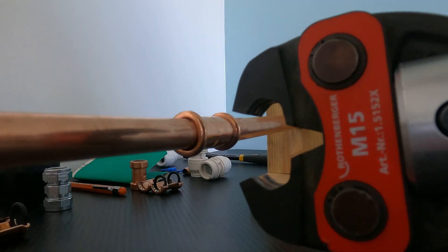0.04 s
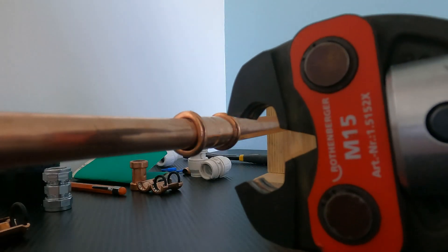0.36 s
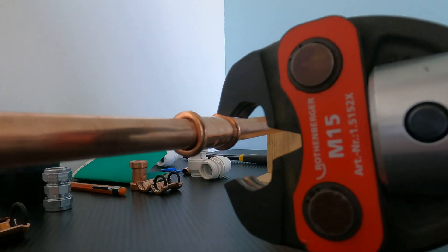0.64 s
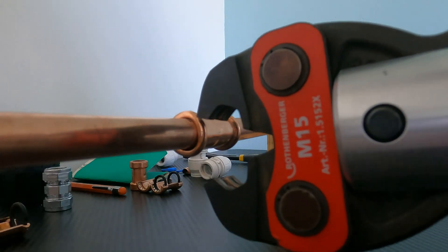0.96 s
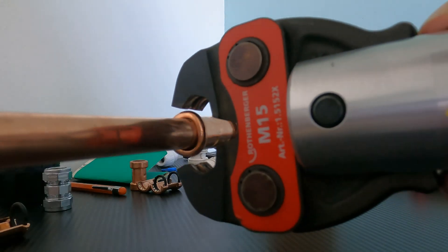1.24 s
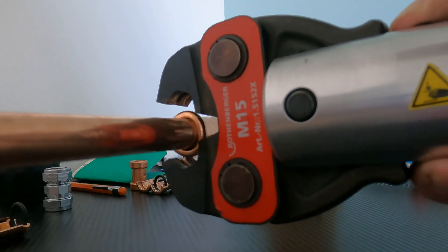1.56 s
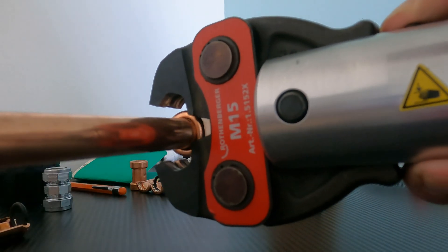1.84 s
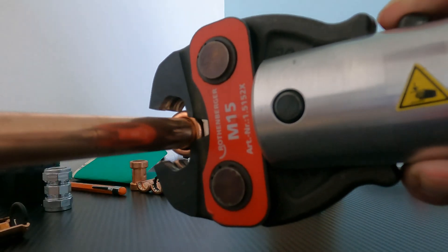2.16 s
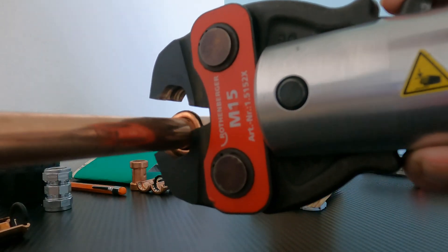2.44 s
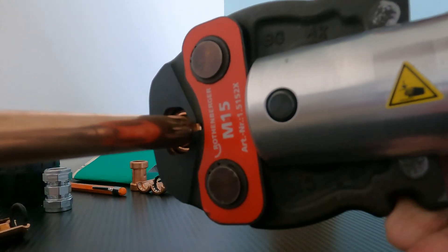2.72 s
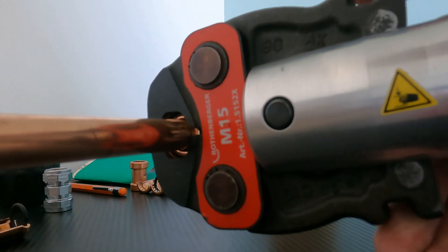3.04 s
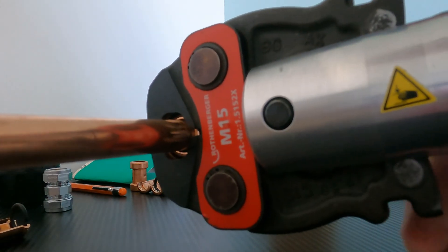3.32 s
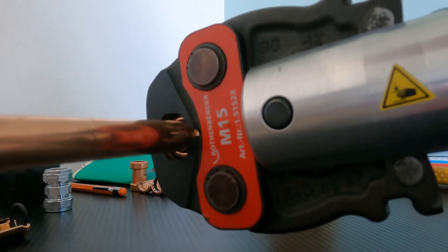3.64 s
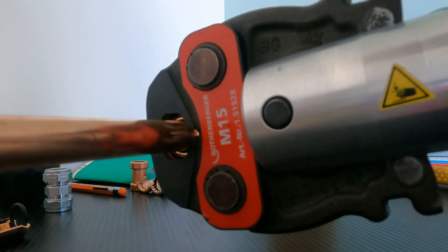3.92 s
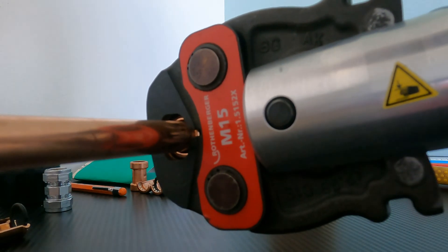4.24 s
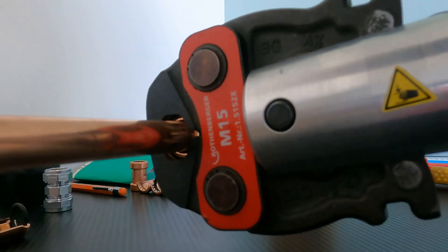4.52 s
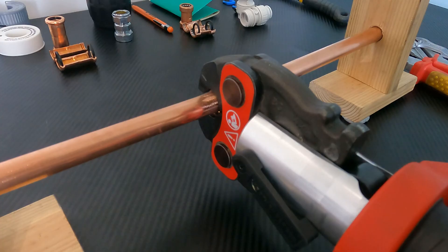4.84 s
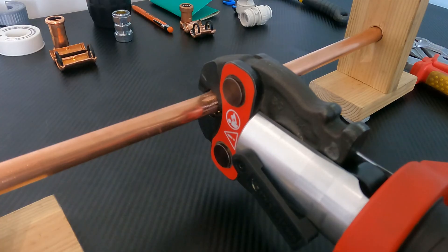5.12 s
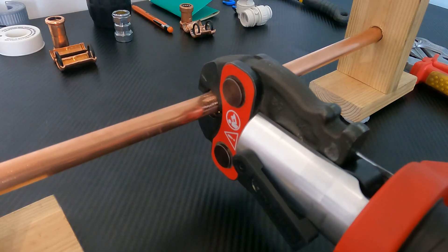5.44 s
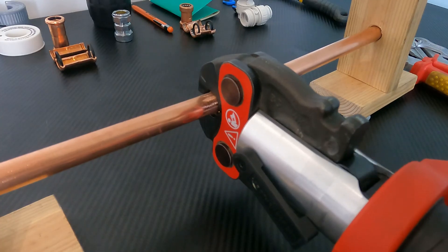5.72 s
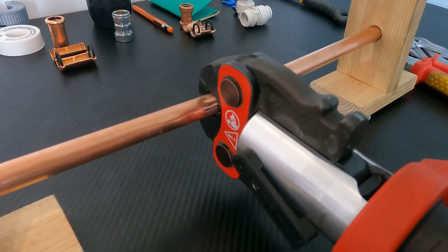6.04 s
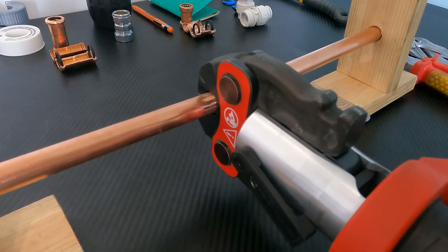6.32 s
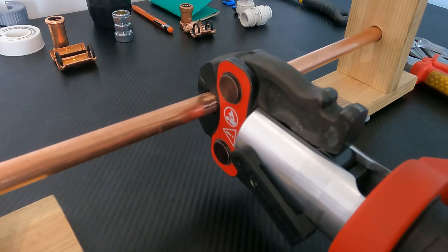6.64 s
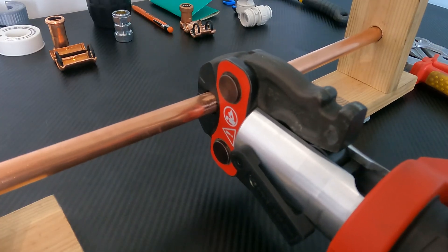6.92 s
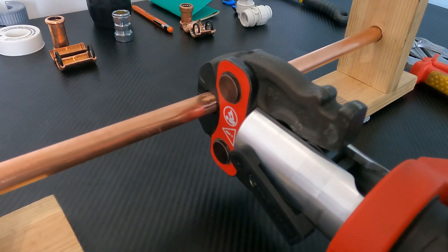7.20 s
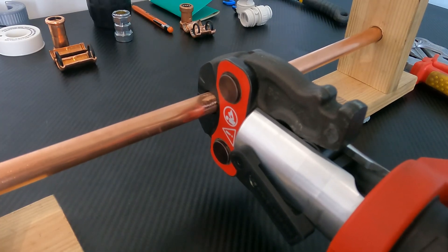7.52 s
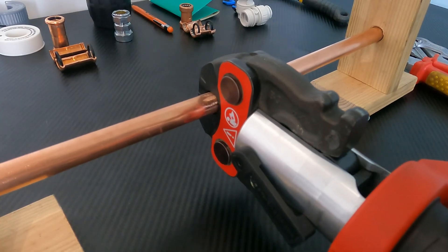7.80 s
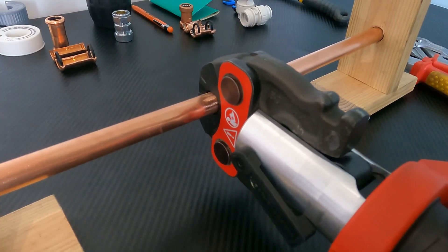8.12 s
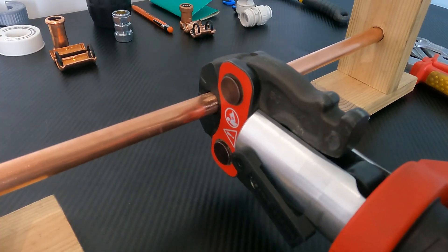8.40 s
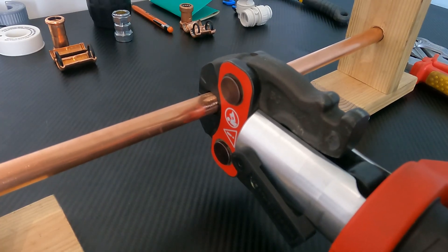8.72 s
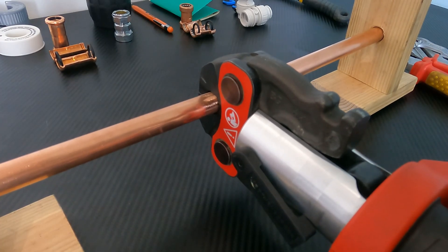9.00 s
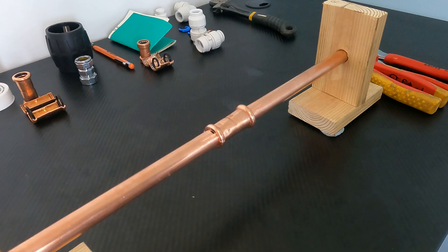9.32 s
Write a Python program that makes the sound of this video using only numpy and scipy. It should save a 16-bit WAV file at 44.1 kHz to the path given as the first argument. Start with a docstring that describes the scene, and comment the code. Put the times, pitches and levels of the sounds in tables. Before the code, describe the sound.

A faint steel ring fades, then a press tool's steel jaw bumps and slides onto a copper pipe fitting and snaps shut. After soft handling and a trigger click, the motor spins up with a geared whine, its pump knocking rapidly and harder as pressure builds. The load releases and the motor coasts down, ending with small clicks. It all sounds close, at a workbench in a small, quiet room.

```python
"""A faint steel ring dies away as a cordless hydraulic press tool shifts on a workbench in a small room.
Its steel jaw bumps and slides onto a copper fitting, then a spring snaps it shut. Grip and trigger click.
The motor spins up and whines through a gear train that turns a piston pump; the piston knocks harder as
oil pressure builds. The relief valve opens, the motor coasts down and the tool clicks in the hand."""
import sys
import numpy as np
from scipy import signal
from scipy.fft import rfft, irfft, next_fast_len
from scipy.io import wavfile
from scipy.ndimage import map_coordinates

SR = 44100
rng = np.random.default_rng(int(sys.argv[2]) if len(sys.argv) > 2 else 0)


def transcribe(signal):
    """Save signal, clipped to [-1, 1], as a 16-bit WAV file at the path in sys.argv[1]."""
    frames = np.atleast_2d(signal).T
    limited = np.clip(frames, -1, 1)
    pcm = np.round(limited * 32767).astype(np.int16)
    wavfile.write(sys.argv[1], SR, pcm)


N = 412776

# Modes of the opening ring, jaw with pipe, loose steel, and pipe with wooden stand.
# Each row: frequency in Hz, level in dB, t60 in seconds.
OPENING_MODES = [(1890, 5, 0.24), (2100, -1, 0.26), (2713, -16, 0.31), (2998, -15, 0.29), (3640, -7, 0.28),
                 (4522, -6, 0.28), (6620, -13, 0.6), (10600, -11, 0.24)]
JAW_MODES = [(133.5, -5, 0.45), (238, -6, 0.16), (329.4, -1, 0.22), (520, -4, .1), (673, -0.5, 0.062),
             (734, 2, .12), (1226, -5, .16), (1296, -2, .18), (1464, -4.5, 0.2), (1860, -3.5, 0.2),
             (2510, -2, 0.092), (2790, -4, 0.17), (2990, -8, 0.1), (3510, -0.5, 0.23), (3950, -1, .12),
             (4250, -3, 0.14), (6750, -4, .15)]
PING_MODES = [(1080, -1, 0.31), (1960, -15, 0.16), (3570, 2, 0.18), (5140, 6, 0.11), (5900, 3, 0.13),
              (6730, -20, 0.56)]
STAND_MODES = [(151, -37.5, .35), (199, -33, 0.21), (237, -32, 0.4)]

# Spectra of the named sounds. Each row: frequency in Hz, relative gain in dB.
WASH_SPECTRUM = [(300, -24), (900, -5), (1900, 3), (3000, -5), (6500, -7.5), (8500, -23), (11000, -28),
                 (15000, -38.5)]
AIR_SPECTRUM = [(12, -50), (20, -10.5), (37, 1), (59, -13.5), (111, -21.5), (151, -8), (183, -19.5),
                (229, -13.5), (337, -24.5), (484, -32.5), (555, -37), (7000, -56.5), (15000, -71)]
RUMBLE_SPECTRUM = [(12, -24), (20, 2.5), (33, 5), (52, 0), (102, -25), (140, -13), (250, -27), (320, -46),
                   (550, -120)]
SCRAPE_SPECTRUM = [(150, -1.5), (350, 10), (800, 2), (1500, 5), (2500, -7), (4000, -38)]
RUSTLE_SPECTRUM = [(1200, -22), (2500, 2.5), (4500, 0.5), (7300, -6), (8500, -17.5), (14000, -34)]
BUMP_SPECTRUM = [(60, -3.5), (200, 13.5), (450, 10.5), (720, 11.5), (930, 6.5), (1300, 5.5), (1800, 2.5),
                 (2130, 0.5), (2500, 4.5), (3500, -4), (4400, -9), (5000, -14.5), (7500, -24), (10000, -46),
                 (15000, -54.5)]
SNAP_SPECTRUM = [(45, -26), (75, -1.5), (100, -12), (150, -0.5), (240, 2.5), (400, -10.5), (680, -3),
                 (1000, -3.5), (1450, -6), (1900, -10), (2500, -6.5), (4500, -13), (7600, -22.5),
                 (11500, -39), (15000, -51)]
CLICK_SPECTRUM = [(200, -20.5), (750, -16.5), (1100, 6), (2000, 4), (3500, 0.5), (5200, 2.5), (7500, -4.5),
                  (10500, -12), (15000, -33)]
GEAR_SPECTRUM = [(60, -10.5), (140, -16.5), (190, -9.5), (320, -6), (480, -3), (800, -2.5), (1100, 3.5),
                 (1800, -0.5), (2700, -3), (3200, -6), (4400, -12.5), (5100, -9.5), (5750, -14),
                 (6600, -14), (7800, -18), (9800, -25), (12300, -31.5), (15000, -48.5)]
FAN_SPECTRUM = [(20, -26.5), (45, -8), (65, -1.5), (110, -5.5), (200, -24.5), (500, -71.5)]
SLAP_SPECTRUM = [(150, -22), (330, -8), (500, 6), (750, 0.5), (1100, 6), (2100, 5.5), (3000, -0.5),
                 (4200, -1), (7500, -16.5), (11000, -36), (15000, -59.5)]
SLACK_SPECTRUM = [(200, -10), (400, -5.5), (750, -2.5), (1100, 9.5), (1500, 5), (2000, 8.5), (2700, -9.5)]
THUD_SPECTRUM = [(40, -23), (80, 8), (220, -9.5), (600, 8), (900, 2), (2000, -35)]
CHATTER_SPECTRUM = [(300, -5.5), (1000, 7), (2300, 3), (3700, -2.5), (5300, 0.5), (6200, -1.5),
                    (8000, -12.5), (11000, -33), (15000, -58)]
ROOM_SIDE_SPECTRUM = [(150, -17.5), (600, -14.5), (1800, -2), (5000, -3), (12000, -24)]

# Room decay. Each row: frequency in Hz, t60 in seconds.
ROOM_DECAY = [(120, 0.28), (700, 0.41), (2000, 0.44), (5000, 0.24), (12000, 0.21)]
# Tool shifting on the bench. Each row: start in seconds, length in seconds, level in dB.
SHIFTS = [(.28, 0.12, -53), (.52, 0.155, -56.5), (1.12, 0.21, -54), (1.47, 0.09, -52.5), (1.67, 0.15, -52),
          (1.93, 0.24, -46), (2.28, 0.53, -43.5), (2.65, 0.1, -32.5), (2.98, 0.1, -47), (3.18, 0.12, -45.5),
          (3.82, 0.26, -50.5), (3.99, 0.21, -44.5), (4.43, 0.14, -44.5), (4.65, 0.83, -57),
          (5.1, 0.11, -52.5), (5.5, 0.31, -31.5), (6.1, 0.41, -41), (7.7, 0.12, -39.5), (8.86, 0.45, -50.5)]
# Sliding steel and hands. Each row: start in seconds, length in seconds, scrape in dB, rustle in dB.
SLIDES = [(1.59, 0.2, -62, -76), (1.78, 0.42, -62.5, -78), (2.23, 0.57, -55.5, -73.5),
          (2.65, 0.17, -50, -59), (2.85, 0.28, -66, -72.5), (3.7, 0.18, -74, -77), (3.87, 0.18, -61.5, -68),
          (4.02, 0.44, -80, -73), (4.24, 0.39, -64, -72), (4.88, 0.084, -64, -69),
          (8.9, 0.51, -78.5, -74.5)]
# First a faint 700 Hz lead-in swelling just before the first knock, then the jaw's knocks on the pipe.
# Each row: start in seconds, level in dB, tilt in dB per octave, favoured Hz, t60 in seconds.
LEAD_IN_AND_BUMPS = [(1.093, -53, 1.5, 700, .08), (1.105, -39, 0.5, 700, 0.09),
                     (1.126, -39.5, 3, 3200, 0.04), (1.131, -33.5, 2, 680, 0.03),
                     (1.217, -41.5, -1.5, 1270, 0.13), (1.244, -41, -3.5, 740, 0.08),
                     (1.261, -48, -2, 530, .05), (1.652, -38, 1.5, 2520, .016), (1.778, -59, -8, 1500, .03),
                     (1.849, -63, -2, 2200, 0.025), (1.893, -41.5, -1, 2010, 0.03),
                     (1.922, -44, 2.5, 4250, .06), (1.931, -37.5, 2, 2400, 0.017),
                     (1.937, -42.5, 5, 4250, 0.022), (2.032, -45.5, -1, 900, 0.039),
                     (2.1, -52, -1.5, 550, 0.09), (2.141, -51, -5, 828, 0.046),
                     (2.222, -51.5, -1.5, 2100, 0.1), (2.263, -44, -3, 800, .05),
                     (2.325, -48, -4.5, 1070, 0.026), (2.404, -45.5, -3.5, 796, 0.049),
                     (2.496, -38, 0.5, 1125, 0.035), (2.577, -37.5, -2.5, 1500, 0.038),
                     (2.947, -46.5, -1.5, 1360, 0.031), (2.980, -40.5, 1, 1120, 0.016),
                     (3.181, -42.5, -5, 285, .05), (3.431, -54, -21, 208, 0.072),
                     (4.422, -56, -3.5, 280, 0.07)]
# Loose steel. Each row: start in seconds, level in dB.
PINGS = [(1.651, -61), (4.237, -58.5)]
# Jaw halves closing. Each row: start in seconds, relative level in dB, favoured frequency in Hz.
SNAP_BLOWS = [(2.645, -18.5, 1440), (2.654, -12, 1380), (2.662, -2.5, 1350), (2.6676, 4, 1370),
              (2.673, 2, 950), (2.678, 1, 198), (2.695, -8.5, 720), (2.713, -12.5, 2353)]
# Grip, trigger, pins. Each row: start in seconds, level in dB, tilt in dB per octave, favoured Hz.
CLICKS = [(3.295, -66, -0.5, 5030), (3.327, -63, -0.5, 5130), (3.571, -67, -4, 1090),
          (3.731, -64, -11, 1100), (3.975, -60, -10, 1120), (4.776, -66, -21, 1080), (4.834, -70, -1, 1800),
          (4.964, -63.5, 1.5, 1110), (5.0629, -50.5, 5.5, 6670), (5.2515, -36.5, 9.5, 6240),
          (8.817, -52.5, -16, 1060), (8.8437, -42.5, 10, 4950), (8.922, -58, -15, 1080),
          (8.972, -61, -0.5, 1120), (9.064, -49, -4, 1850), (9.098, -54.5, -0.5, 1800),
          (9.116, -57, 11, 1540), (9.227, -61, 0, 6600), (9.287, -53, -8, 970)]
# Oil pressure. Each row: time in seconds, share of the relief pressure.
OIL_PRESSURE = [(5.65, 0), (5.8, .032), (6.0, .128), (6.2, .213), (6.45, .224), (6.7, .284), (6.95, .29),
                (7.1, .373), (7.25, .554), (7.45, .701), (7.58, .802), (7.665, 1), (7.72, .373), (7.78, 0)]
# Shaft and mesh tones. Each row: multiple of pump speed, relative level in dB, change under load in dB.
MESH_TONES = [(0.98, -48.5, 2.4), (3, -56, 3.5), (4, -60, 5.4), (5, -46, 0.85), (8, -55, 11),
              (11, -59.5, 10), (125 / 9, -36, -0.5), (18, -51.5, 4.1), (20, -53.5, 9), (22, -48, 4.8),
              (250 / 9, -49, -1.5), (36, -55, 7), (45, -39, -9.5), (500 / 9, -42.5, -8), (94, -36.5, -1)]
# Slack gear tones. Each row: multiple of pump speed, relative level in dB.
SLACK_TONES = [(375 / 9, -48.5), (44, -42), (46, -44.5), (68, -42.5), (110, -57), (170, -53),
               (500 / 3, -39), (300, -36.5)]
# Whine. Each row: multiple of rotor speed, relative level in dB, load change in dB, coast change in dB.
WHINE_TONES = [(10, -1, -34.5, 6), (13, -9, -21, -23.5), (17.72, -13, -5.5, -18), (18, 1, -24.5, -2),
               (20, -12.5, -18, -1)]
# Motor can peaks and dips, then pump housing resonances. Each row: centre in Hz, width in Hz, gain in dB.
CAN_BANDS = [(2560, 1640, -12.5), (3950, 91, 14), (4740, 190, 12.5), (5120, 140, 7.5), (6090, 300, 10)]
HOUSING_MODES = [(1018, 87, 1), (1720, 58, -2), (2122, 160, -1.5), (2742, 170, 1), (3800, 260, -15),
                 (4700, 190, -8), (5100, 540, -15), (6380, 300, -26)]
# Valve squeals. Each row: pitch in Hz, load change in Hz, lead on the knock in turns, relative level in
# dB, load change in dB.
SQUEALS = [(10000, -1600, 0.25, -34.5, -9.5), (7500, -700, 0.13, -54.5, 23)]
# Motor balance. Each row: frequency in Hz, left minus right in dB.
MOTOR_PAN = [(100, 3), (500, -1.5), (1200, -1.5), (2200, -2), (4000, -3.5), (8000, 0.1)]

TRIGGER_S, LAST_STROKE_S, POWER_CUT_S = 5.245, 7.6636, 7.735
FREE_RPS = 29.55  # unloaded pump shaft
ROTOR_RATIO = 125 / 9  # rotor turns per pump turn


def amp(db):
    """Decibels to gain."""
    return 10 ** (np.asarray(db) / 20)


def along(points, hz):
    """Read (Hz, value) points on a log axis."""
    knots_hz, values = np.transpose(points)
    return np.interp(np.log(hz + 1), np.log(knots_hz + 1), values)


def ramp(start_s, length_s):
    """Rise from 0 to 1 and hold."""
    return np.clip((np.arange(N) / SR - start_s) / length_s, 0, 1)


def wobble(rate_hz):
    """Smooth random curve."""
    return map_coordinates(rng.standard_normal(int(N * rate_hz / SR) + 4), [np.arange(N) * rate_hz / SR])


def filtered(x, response):
    """Apply a complex frequency response."""
    size = x.shape[-1]
    padded = next_fast_len(size + 8192)
    return irfft(rfft(x, padded) * response(np.fft.rfftfreq(padded, 1 / SR)), padded)[..., :size]


def lowpass(x, cutoff_hz):
    """Steep zero-phase treble cut."""
    return filtered(x, lambda hz: 1 / (1 + (hz / cutoff_hz) ** 8))


def resonance(hz, centre_hz, width_hz):
    """Band-pass response of one mode."""
    return 1j * hz * width_hz / (centre_hz ** 2 - hz * hz + 1j * hz * width_hz)


def coloured(x, spectrum, size=4096):
    """Minimum-phase filter through (Hz, dB) points."""
    cepstrum = irfft(np.log(amp(along(spectrum, np.fft.rfftfreq(size, 1 / SR)))))
    cepstrum[1:size // 2] *= 2
    cepstrum[size // 2 + 1:] = 0
    return signal.fftconvolve(x, irfft(np.exp(rfft(cepstrum))))[:len(x)]


def noise(spectrum):
    """Coloured noise of rms 1."""
    x = coloured(rng.standard_normal(N), spectrum)
    return x / np.sqrt(np.mean(x ** 2) + 1e-20)


def add(track, start_s, x):
    """Mix x into the track."""
    part = track[round(start_s * SR):][:len(x)]
    part += x[:len(part)]


def pulses(at, size):
    """Impulses at fractional sample positions."""
    taps = np.floor(at).astype(int)[:, None] + np.arange(-7, 9)
    gap = taps - at[:, None]
    shape = np.sinc(gap) * np.cos(np.pi * gap / 16) ** 2
    return np.bincount(np.clip(taps, 0, N - 1).ravel(), (shape * size[:, None]).ravel(), N)


def ringing(modes, t):
    """Damped modes of random strength and phase."""
    return sum(amp(db + rng.normal(0, 2.7) - 60 * t / t60_s) * np.sin(2 * np.pi * (hz * t + rng.random()))
               for hz, db, t60_s in modes)


def in_room(x, wet_db):
    """Centred direct sound plus a diffuse tail, partly alike left and right."""
    hz, t, spectra = signal.stft(rng.standard_normal((2, SR // 2)), SR, nperseg=256)
    tail = signal.istft(spectra * amp(-60 * t / along(ROOM_DECAY, hz)[:, None]), SR, nperseg=256)[1]
    mid, side = np.pad(tail / np.linalg.norm(tail[0]), ((0, 0), (SR // 250, 0)))
    side = filtered(side, lambda hz: amp(along(ROOM_SIDE_SPECTRUM, hz)))
    wet = signal.fftconvolve(x[None], np.array([mid + side, mid - side]), axes=1)[:, :N]
    return x + amp(wet_db) * wet


def opening_ring(modes_db=-59, wash_db=-52.5, wash_t60_s=0.39):
    """Knocked steel dies away: a few clear modes over a wash of dense ones."""
    t = np.arange(N) / SR
    modes = amp(modes_db) * ringing(OPENING_MODES, t)
    wash = amp(wash_db - 60 * t / wash_t60_s) * noise(WASH_SPECTRUM)
    return ramp(0, 0.0013) * (modes + wash)


def room_air():
    """Quiet low background noise, mostly centred."""
    centre = amp(-60.5) * noise(AIR_SPECTRUM)
    return centre + amp(-73.5) * np.array([noise(AIR_SPECTRUM), noise(AIR_SPECTRUM)])


def swells(movements):
    """One gain curve per dB column; each movement is a flattened half sine."""
    gains = np.zeros((len(movements[0]) - 2, N))
    for start_s, length_s, *levels_db in movements:
        shape = np.abs(np.sin(np.linspace(0, np.pi, round(length_s * SR)))) ** 0.39
        for gain, db in zip(gains, levels_db):
            add(gain, start_s, amp(db) * shape)
    return gains


def handling():
    """The tool shifts with a dull rumble; steel slides on copper in grains; hands rustle on the grip."""
    rumble_gain, = swells(SHIFTS)
    scrape_gain, rustle_gain = swells(SLIDES)
    grain_db = 4 * wobble(45) + 1.1 * wobble(490)
    scrape = scrape_gain * amp(grain_db) * noise(SCRAPE_SPECTRUM)
    rustle = rustle_gain * amp(0.43 * grain_db) * noise(RUSTLE_SPECTRUM)
    return in_room(scrape + rustle, wet_db=-9.5) + rumble_gain * noise(RUMBLE_SPECTRUM)


def strike(favoured_hz, t60_s, ring_db, attack_s, tick=0):
    """Noise burst, jaw modes, optional tick; the contact point detunes the modes and favours one band."""
    t = np.arange(SR // 2) / SR
    crack = amp(-60 * t / t60_s) * rng.standard_normal(len(t))
    ring = amp(ring_db) * ringing(JAW_MODES, t * rng.normal(1, 0.018))
    blow = tick * (t == 0) + (crack + ring) * (1 - np.exp(-t / attack_s))
    return filtered(blow, lambda hz: 1 + amp(6.5) * resonance(hz, favoured_hz, 0.14 * favoured_hz))


def tilted(blow, db_per_octave, low_hz, high_hz):
    """Hard contacts are bright, soft ones dull."""
    return coloured(blow, [(low_hz, 0), (high_hz, db_per_octave * np.log2(high_hz / low_hz))])


def at_level(blow, db):
    """Set the rms of the first 20 ms."""
    return amp(db) * blow / np.std(blow[:SR // 50])


def lead_in_and_bumps(seated_s=1.5, seated_db=-4.5):
    """A faint 700 Hz lead-in swells, then jaw and pipe knock and ring, damped once the jaw is seated."""
    track = np.zeros(N)
    for start_s, db, tilt, favoured_hz, t60_s in LEAD_IN_AND_BUMPS:
        ring_db = -31.5 + 10 * np.log10(t60_s / 0.04) + seated_db * (start_s > seated_s)
        burst = strike(favoured_hz, t60_s, ring_db, attack_s=0.27 * t60_s)
        burst = tilted(coloured(burst, BUMP_SPECTRUM), tilt, low_hz=300, high_hz=5000)
        add(track, start_s, at_level(burst, db))
    return track


def pings(attack_s=0.00067):
    """Loose steel rings briefly."""
    track, t = np.zeros(N), np.arange(SR // 2) / SR
    for start_s, db in PINGS:
        add(track, start_s, amp(db) * ringing(PING_MODES, t) * (1 - np.exp(-t / attack_s)))
    return track


def jaw_snap(thump_s=2.668):
    """The spring drives both jaw halves onto the fitting in a cluster of blows; pipe and stand thump."""
    track, t = np.zeros(N), np.arange(SR // 2) / SR
    for start_s, db, favoured_hz in SNAP_BLOWS:
        blow = strike(favoured_hz, t60_s=0.023, ring_db=-31, attack_s=0.00039)
        add(track, start_s, at_level(coloured(blow, SNAP_SPECTRUM), db - 25))
    add(track, thump_s, ringing(STAND_MODES, t) * (1 - np.exp(-t / 0.004)))
    return track


def small_clicks():
    """Grip, trigger and jaw pins make short, dry contacts."""
    track = np.zeros(N)
    for start_s, db, tilt, favoured_hz in CLICKS:
        blow = strike(favoured_hz, t60_s=0.01, ring_db=-38, attack_s=0.0001, tick=3.6)
        blow = tilted(coloured(blow, CLICK_SPECTRUM), tilt, low_hz=870, high_hz=6000)
        add(track, start_s, at_level(blow, db))
    return track


def shaft_rps(pressure, spin_up_s=0.108, sag_rps=4.69, cut_rps=28.32, friction_rps2=27.9, drag_per_s=0.5):
    """The pump shaft spins up, sags under pressure, then coasts against dry friction and drag."""
    t = np.arange(N) / SR
    driven = (FREE_RPS - sag_rps * pressure) * np.tanh((t - TRIGGER_S) / spin_up_s)
    offset_rps = friction_rps2 / drag_per_s
    coasting = (cut_rps + offset_rps) * np.exp(-drag_per_s * (t - POWER_CUT_S)) - offset_rps
    return np.maximum(np.minimum(driven, coasting), 0)


def turning(rps, silent_rps=0.546, fade_rps=7.2):
    """Fade from 1 to 0 as the shaft comes to rest."""
    return np.clip((rps - silent_rps) / fade_rps, 0, 1)


def gear_gains(rps, pressure, released):
    """Rattle body and treble gains: a surge at spin-up, quieter as load holds the teeth together."""
    drive = rps / FREE_RPS
    surge = (1 - released) * drive * (1 - drive) ** 2
    gate = ramp(TRIGGER_S, 0.009) * (1 - released + released * turning(rps))
    body_db = -25.5 - 23 * pressure ** 1.44 - 4.5 * released + 2 * surge / surge.max()
    treble_db = -29.5 - 15 * pressure - 7 * released
    return gate * amp(body_db), gate * amp(treble_db)


def gear_rattle(turns, rps, pressure, released, teeth=125, jitter_s=0.00004):
    """Teeth strike in a pattern that repeats each pump turn, never quite alike."""
    tooth = np.arange(np.ceil(turns[0] * teeth) + 1, turns[-1] * teeth - 1).astype(int)
    size, offset = rng.standard_normal((2, teeth))
    time_scatter, size_scatter = rng.standard_normal((len(tooth), 2)).T
    at = np.interp((tooth + 0.3 * offset[tooth % teeth]) / teeth, turns, np.arange(N))
    impacts = pulses(at + jitter_s * SR * time_scatter, size[tooth % teeth] + 0.65 * size_scatter)
    drive = np.gradient(turns) * SR / FREE_RPS
    running = drive > 0
    rattle = coloured(impacts / np.std(impacts[running]) + 0.47 * rng.standard_normal(N), GEAR_SPECTRUM)
    # the eccentric loads the teeth twice and four times a turn
    throb = 7.4 * np.cos(4 * np.pi * turns) + 1.8 * np.cos(8 * np.pi * turns)
    rattle *= 1 + (0.025 + 0.018 * pressure) * throb
    treble = filtered(rattle, lambda hz: 1 / (1 + (3500 / (hz + 1)) ** 8))
    body = rattle - treble - np.clip(1 - drive, 0, 1) * lowpass(rattle, 800)  # slow gears lose bass
    body_gain, treble_gain = gear_gains(rps, pressure, released)
    return body_gain * body / np.std(body[running]) + treble_gain * treble / np.std(treble[running])


def partials(tones, turns, flutter_db):
    """Unsteady tones locked to the shaft."""
    return sum(amp(db + flutter_db * wobble(45)) * np.sin(2 * np.pi * k * turns + 0.0041 * k * wobble(70))
               for k, db in tones)


def gear_hum(uneven_turns, rps, pressure, released):
    """Shafts and meshes hum with a fast flutter; the rotor adds its own hum while coasting."""
    drive = rps / FREE_RPS
    load = np.tanh(pressure / 0.27)
    tones = [(k, db + load_db * load) for k, db, load_db in MESH_TONES]
    mesh = partials(tones, uneven_turns, flutter_db=1) * (1 + 0.34 * wobble(170))
    mesh_gain = amp(4 - 8.5 * pressure - 10.5 * released) * drive ** 0.83
    rotor_gain = amp(-46.5 + 1.8 * wobble(5.3)) * released * drive ** 2.2
    return mesh_gain * mesh + rotor_gain * np.sin(2 * np.pi * ROTOR_RATIO * uneven_turns)


def slack_gears(turns, uneven_turns, rps):
    """Spinning up and coasting, the gears run slack and sing through the shell."""
    starting = np.clip(1 - (turns - turns[0]) / 6, 0, 1)
    coasting = np.clip(turns / 3, 0, 1)
    gain = (amp(8) * starting + coasting) * np.minimum(4 * rps / FREE_RPS, 1)
    tones = partials(SLACK_TONES, uneven_turns + 0.0014 * wobble(150), flutter_db=1.5)
    return filtered(gain * tones, lambda hz: amp(along(SLACK_SPECTRUM, hz)))


def rotor_whine(turns, uneven_turns, rps, pressure, released, dip_lead_turns=0.14, end_rps=17.3):
    """The whine dips once a stroke and flares as it sweeps through the motor can's resonances."""
    rotor_rad = 2 * np.pi * ROTOR_RATIO * uneven_turns
    shake_rad = 0.53 * np.sin(2 * np.pi * turns)
    tone = np.zeros(N)
    for k, db, load_db, coast_db in WHINE_TONES:
        flutter_db = (1.7 + 0.5 * released) * wobble(60)
        gain = amp(db + load_db * pressure + coast_db * released + flutter_db)
        tone += gain * np.sin(k * rotor_rad + shake_rad + 0.98 * wobble(120))
    tone *= amp(-31) * (rps / FREE_RPS) ** (1 + 1.3 * released)
    tone *= 1 - 0.4 * np.cos(2 * np.pi * (turns + dip_lead_turns))
    tone *= 1 - released * np.clip(end_rps + 1 - rps, 0, 1)
    return filtered(tone, lambda hz: amp(sum(db * np.exp(-((hz - centre_hz) / width_hz) ** 2)
                                             for centre_hz, width_hz, db in CAN_BANDS)))


def fan_draught(rps):
    """Cooling air rumbles, independently left and right."""
    return amp(-49) * (rps / FREE_RPS) ** 4 * np.array([noise(FAN_SPECTRUM), noise(FAN_SPECTRUM)])


def strokes(turns):
    """Sample positions at which the pump completes a turn."""
    return np.interp(np.arange(np.ceil(turns[0]), turns[-1]), turns, np.arange(N))


def knock_strength_db(rps, pressure, released, full_db=-0.2, idle_db=-9.5, coast_db=-15):
    """Knocks grow with pressure; once the relief valve opens they are weak and loose."""
    pumping = np.maximum(amp(full_db) * np.tanh(pressure / 0.2), amp(idle_db))
    loose = amp(coast_db) * (1 - rps / FREE_RPS) * turning(rps)
    return 20 * np.log10(np.where(released > 0, loose, pumping) + 1e-9)


def housing(blows):
    """The pump block resonates; its shell muffles the top treble."""
    ring = filtered(blows, lambda hz: sum((-1) ** k * amp(db) * resonance(hz, centre_hz, width_hz)
                                          for k, (centre_hz, width_hz, db) in enumerate(HOUSING_MODES)))
    return lowpass(ring, cutoff_hz=7000)


def piston(turns, pressure, knock_db, bounce_s=0.00094, chatter_s=0.0038):
    """One double blow a turn, with oil-cushioned rebound, oil ring, check valve chatter and thud."""
    at = strokes(turns)
    size_scatter, time_scatter = rng.standard_normal((len(at), 2)).T
    size = amp(0.5 * size_scatter + knock_db[at.astype(int)])
    blows = pulses(at, size) + pulses(at + bounce_s * SR, 0.41 * size)
    rebound_s = 0.0024 + 0.00188 * pressure[at.astype(int)] + 0.00038 * time_scatter
    rebounds = lowpass(pulses(at + rebound_s * SR, 0.45 * size), cutoff_hz=2300)
    t = np.arange(SR // 50) / SR
    chatter_gain = signal.fftconvolve(blows, np.exp(-t / chatter_s))[:N]
    chatter = coloured(chatter_gain * rng.standard_normal(N), CHATTER_SPECTRUM)
    thud = coloured(blows, THUD_SPECTRUM)
    return amp(18) * housing(blows + rebounds) + oil_ring(at, size, pressure) + amp(-18.5) * chatter + thud


def oil_ring(at, size, pressure, start_hz=2890, fall_s=0.001174, peak_s=0.0013):
    """Each stroke sets the oil ringing; the pitch drops within milliseconds, further under load."""
    track, t = np.zeros(N), np.arange(SR // 50) / SR
    shape = t / peak_s * np.exp(1 - t / peak_s)
    for i, gain, detune in zip(at.astype(int), size, rng.normal(1, 0.043, len(at))):
        end_hz = 1500 - 650 * pressure[i]
        pitch_hz = detune * (end_hz + (start_hz - end_hz) * np.exp(-t / fall_s))
        chirp = np.sin(2 * np.pi * np.cumsum(pitch_hz) / SR)
        add(track, i / SR, gain * np.sqrt(pressure[i]) * shape * chirp)
    return amp(-19.5) * track


def valve_squeal(turns, pressure, knock_db, fall_hz_per_turn=2200):
    """Oil squeals through the valve before each pressure knock, falling in pitch."""
    track = np.zeros(N)
    for hz, load_hz, lead_turns, db, load_db in SQUEALS:
        phase_turns = (turns + lead_turns + 0.5) % 1 - 0.5
        pitch_hz = hz + load_hz * pressure - fall_hz_per_turn * phase_turns + 330 * wobble(1500)
        opening = np.cos(np.pi * phase_turns) ** 8
        gain = amp(db + load_db * pressure + 0.5 * knock_db)
        track += gain * opening * np.sin(2 * np.pi * np.cumsum(pitch_hz) / SR)
    return track * np.minimum(10 * pressure, 1)


def piston_slaps(turns, rps, released, tick_t60_s=0.0049, rattle_t60_s=0.064):
    """With the relief valve open, the unloaded piston clacks once a turn, ever more slowly."""
    at = strokes(turns).astype(int)
    strength = released * turning(rps) * (1 - rps / FREE_RPS) ** 0.16
    blows = np.bincount(at, strength[at], N)
    t = np.arange(SR // 10) / SR
    shape = amp(-60 * t / rattle_t60_s - 6) + amp(-60 * t / tick_t60_s)
    return amp(-20) * signal.fftconvolve(blows, shape)[:N] * noise(SLAP_SPECTRUM)


def panned(x, right_lead_s=0.000008):
    """The motor's balance varies with frequency; the right side hears it slightly earlier."""
    return filtered(x, lambda hz: amp(np.outer([0.5, -0.5], along(MOTOR_PAN, hz)))
                    * np.exp(np.outer([-1, 1], 1j * np.pi * hz * right_lead_s)))


def motor_and_pump():
    """Oil pressure sets speed and levels; one shaft angle drives teeth, piston and tones."""
    pressure = np.interp(np.arange(N) / SR, *np.transpose(OIL_PRESSURE))
    released = ramp(LAST_STROKE_S + 0.0086, 0.097)  # relief valve: 0 shut, 1 open
    rps = shaft_rps(pressure)
    turns = np.cumsum(rps) / SR
    turns -= turns[round(LAST_STROKE_S * SR)]
    knock_db = knock_strength_db(rps, pressure, released)
    # the shaft slows against each pressure stroke
    uneven_turns = turns + 0.0029 * amp(2 * knock_db) * np.sin(2 * np.pi * (turns + 0.36))
    tool = gear_rattle(turns, rps, pressure, released)
    tool += piston(turns, pressure, knock_db)
    tool += valve_squeal(turns, pressure, knock_db)
    tool += piston_slaps(turns, rps, released)
    tool += gear_hum(uneven_turns, rps, pressure, released)
    tool += slack_gears(turns, uneven_turns, rps)
    tool += rotor_whine(turns, uneven_turns, rps, pressure, released)
    return panned(in_room(tool, wet_db=-7.5)) + fan_draught(rps)


def scene():
    """Jaw, motor and hands in a quiet room."""
    steel = lead_in_and_bumps() + pings() + opening_ring()
    air = room_air()
    contacts = in_room(steel, wet_db=-13)
    contacts += in_room(small_clicks(), wet_db=-5)
    contacts += in_room(jaw_snap(), wet_db=-11)
    return contacts + motor_and_pump() + handling() + air


def record(dry):
    """Cut everything above 15050 Hz."""
    return filtered(dry, lambda hz: hz < 15050)


dry = scene()
out = record(dry)
transcribe(out)
```